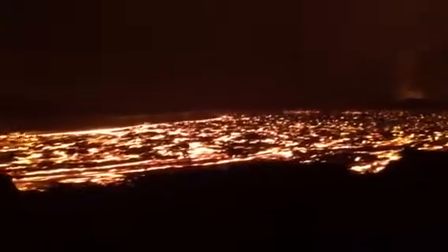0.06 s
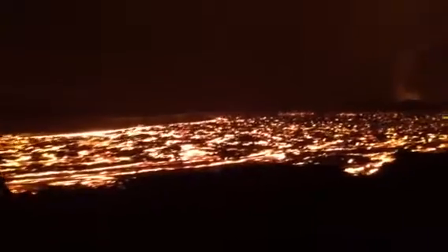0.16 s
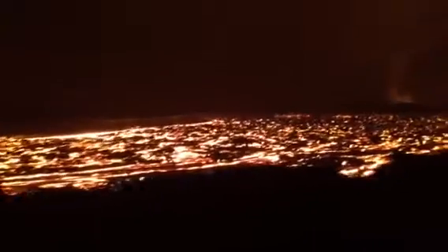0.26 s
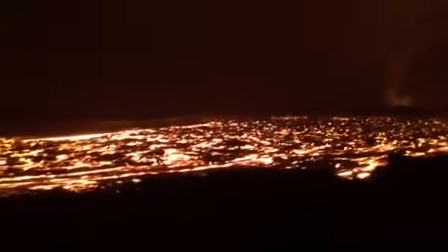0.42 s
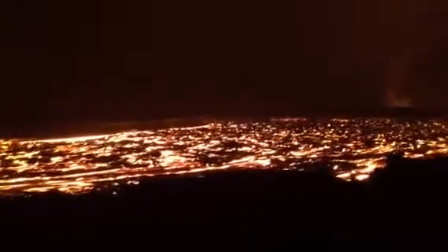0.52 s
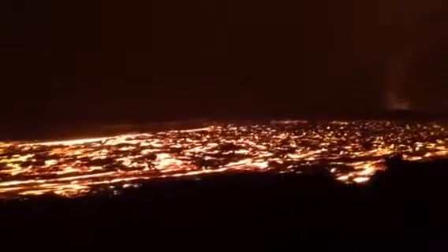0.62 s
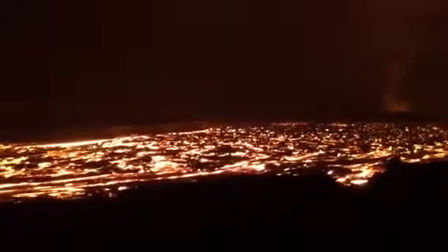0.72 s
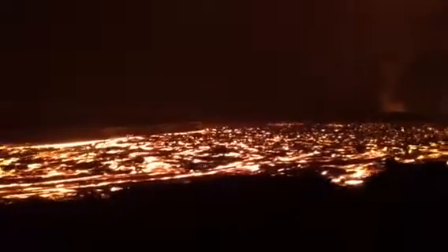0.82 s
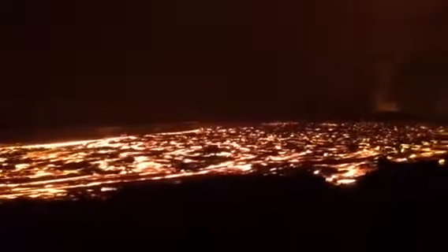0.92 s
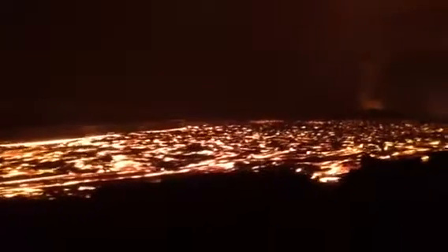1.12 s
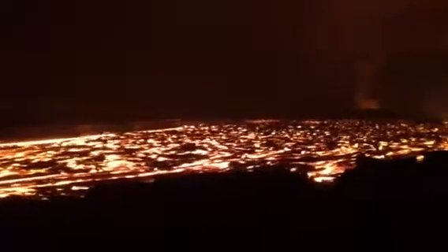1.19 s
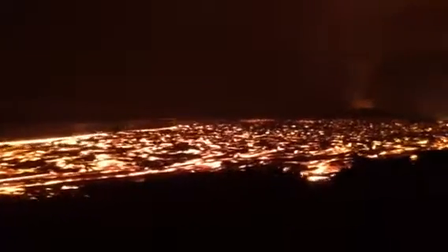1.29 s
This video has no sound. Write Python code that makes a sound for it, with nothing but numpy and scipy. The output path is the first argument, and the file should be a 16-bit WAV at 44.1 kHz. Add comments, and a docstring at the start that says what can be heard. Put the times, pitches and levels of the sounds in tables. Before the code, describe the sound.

A gust of wind rumbles and buffets an open microphone over steady fine hiss at night

```python
"""Night at the edge of a lava field, an open microphone in the wind, the flow far off.
From the start a fine, nearly even hiss lies over the low rush of the distant flow; puffs thump throughout.
Before a quarter second one strong gust rumbles in: the harder it blows, the higher the rumble reaches.
It stirs up a thin, whistling hiss, flutters in a higher roar at 0.42 s and is gone soon after 0.6 s.
One dry tick follows at 0.81 s; towards the end the rush swells a little."""
import sys
import numpy as np
from scipy import signal
from scipy.fft import rfft, irfft, next_fast_len
from scipy.io import wavfile
from scipy.ndimage import uniform_filter1d, map_coordinates

SR = 44100
rng = np.random.default_rng(int(sys.argv[2]) if len(sys.argv) > 2 else 0)


def wav_record(signal):
    """Record a signal, one row per channel, as 16-bit PCM in the file named by sys.argv[1]."""
    frames = np.transpose(np.atleast_2d(signal))
    bounded = np.clip(frames, -1, 1)
    # unit amplitude maps onto the largest positive 16-bit level
    quanta = np.round(bounded * 32767).astype(np.int16)
    wavfile.write(sys.argv[1], SR, quanta)


N = 59535  # 1.35 s


def amp(db):
    """Decibels to amplitude gain."""
    return 10 ** (np.asarray(db) / 20)


def unit(x):
    """The signal scaled to rms 1."""
    return x / np.sqrt(np.mean(x ** 2) + 1e-20)


def along(points, hz):
    """(f/Hz, value) points interpolated on a logarithmic frequency axis."""
    f, value = np.transpose(points)
    return np.interp(np.log(hz + 1), np.log(f + 1), value)


def curve(rows):
    """(t/s, value) points interpolated to one value per sample."""
    return np.interp(np.arange(N) / SR, *np.transpose(rows))


def wobble(rate):
    """A smooth random curve through `rate` normally distributed knots per second."""
    knots = rng.standard_normal(256)
    position = np.arange(N) * rate / SR + 2
    return map_coordinates(knots, [position], mode="mirror")


def filtered(x, response):
    """The signal shaped by a gain that depends on frequency in Hz."""
    size = next_fast_len(N + 8192)  # zero padding leaves room for the filter's ringing
    spectrum = rfft(x, size) * response(np.fft.rfftfreq(size, 1 / SR))
    return irfft(spectrum, size)[..., :N]


def noise(colour):
    """Random noise with the given spectrum, scaled to rms 1."""
    return unit(filtered(rng.standard_normal(N), lambda hz: amp(along(colour, hz))))


def patchy(x, depth_db):
    """The signal with random gain patches in time and frequency, scaled to rms 1."""
    z = signal.stft(x, nperseg=2048)[2]
    field = uniform_filter1d(rng.standard_normal(z.shape), size=4, axis=0)  # across frequency
    field = uniform_filter1d(field, size=7, axis=1)  # across time
    return unit(signal.istft(z * amp(depth_db * unit(field)))[1][:N])


def even(x, span_s):
    """The signal divided by its local rms under a bell of the given width: slow swells vanish."""
    t = np.arange(-SR // 10, SR // 10 + 1) / SR
    bell = np.exp(-.5 * (t / span_s) ** 2)
    power = np.abs(signal.fftconvolve(x ** 2, bell / bell.sum(), "same"))
    return x / np.sqrt(power + 1e-12)


# Pressure of the strong gust on the microphone: [t/s, level/dB]
GUST_PRESSURE = [(.18, -70), (.222, -46), (.236, -43), (.25, -43), (.263, -41), (.282, -43), (.305, -42.5),
                 (.325, -38), (.343, -40.5), (.365, -32.5), (.40, -37.5), (.411, -40), (.422, -34),
                 (.449, -49), (.464, -33.5), (.478, -42.5), (.492, -41), (.51, -54.5), (.57, -66),
                 (.64, -77)]
# Spectrum of the buffeting before the eddy size limits it: [f/Hz, relative level/dB per Hz]
BUFFET_COLOUR = [(15, -43), (28, -8), (42, -8.5), (70, 6), (120, 1.5), (200, 0.5), (300, -9.5), (420, -10),
                 (490, -29), (900, -55)]
# The rumble's upper edge is EDGE_HZ at a wind level of GUST_DB; it rises with the wind
GUST_DB, EDGE_HZ, EDGE_OCTAVES_PER_DB = -38, 370, 0.42
EDGE_DB_PER_OCTAVE = 20  # fall above the edge


def buffeting(count=13):
    """Turbulent pressure in half-octave eddy sizes; stronger wind wakes smaller, higher eddies."""
    wind_db = curve(GUST_PRESSURE)
    centres = 20 * 2 ** (np.arange(count) / 2)[:, None]

    def bands(hz):
        """Overlapping triangular bands, one for each eddy size."""
        octaves_away = np.abs(np.log2((hz + 1) / centres))
        return np.clip(1 - 2 * octaves_away, 0, 1)

    eddies = filtered(noise(BUFFET_COLOUR), bands)
    edge_shift = EDGE_OCTAVES_PER_DB * (wind_db - GUST_DB)
    octaves_over = np.clip(np.log2(centres / EDGE_HZ) - edge_shift, 0, 4)
    rumble = np.sum(eddies * amp(-EDGE_DB_PER_OCTAVE * octaves_over), axis=0)
    return amp(wind_db) * even(rumble, span_s=0.0063)


# Single puffs and thumps of wind at the microphone: [t/s, level/dB, half-length/s, centre f/Hz]
WIND_PUFFS = [(0.0, -53.5, 0.011, 60.4), (0.11, -62, 0.029, 72.5), (0.167, -50, 0.0065, 70),
              (.238, -40.5, 0.0069, 68), (.262, -39.5, .0055, 197), (0.302, -36, .011, 64.4),
              (.365, -34, .0045, 116), (.386, -30, 0.0021, 133), (.402, -29.5, 0.003, 78),
              (.424, -37.5, 0.011, 129), (0.463, -35, 0.0027, 298), (0.474, -35, 0.0067, 68),
              (0.527, -40.5, 0.012, 84.5), (0.558, -47, 0.011, 53.5), (0.611, -61, 0.012, 74),
              (0.673, -63, 0.0059, 179), (.714, -52, 0.0063, 157), (0.726, -42, 0.005, 70),
              (0.769, -50.5, 0.0039, 80), (0.79, -53, 0.017, 46.4), (0.835, -55.5, 0.0083, 184),
              (.897, -56.5, .01, 159), (0.944, -53.5, 0.002, 298), (0.969, -54.5, 0.017, 166),
              (1.02, -55.5, 0.0058, 193), (1.047, -48.5, 0.017, 61.3), (1.087, -42, 0.014, 80),
              (1.2, -53, 0.0081, 99), (1.226, -55, 0.0038, 221), (1.262, -52, 0.016, 63)]
# A puff's pitch sinks (octaves per half-length) and wanders (octaves, knots per s)
PUFF_SINK, PUFF_WANDER, PUFF_WANDER_RATE = 0.05, 0.29, 170
PUFF_ROUGH, PUFF_ROUGH_RATE = .3, 220  # raggedness of the swings: share, knots per s
PUFF_TOP_HZ = 444  # eddies much smaller than the microphone cancel out above this


def puffs():
    """Each puff is one eddy: a few uneven swings of pressure that swell, sink in pitch and fade."""
    t, out = np.arange(N) / SR, np.zeros(N)
    for at_s, db, half_length, centre in WIND_PUFFS:
        age = np.clip((t - at_s) / half_length, -6, 6)
        swell = np.exp(-.5 * age ** 2)
        wander = PUFF_WANDER * wobble(PUFF_WANDER_RATE)
        wander = wander - np.average(wander, weights=swell)  # keeps the pitch around its centre
        turns = np.cumsum(centre * 2 ** (wander - PUFF_SINK * age)) / SR
        turns_from_peak = turns - np.interp(at_s, t, turns)
        swing = np.sin(2 * np.pi * (turns_from_peak + rng.random()))
        ragged = swing * (1 + PUFF_ROUGH * wobble(PUFF_ROUGH_RATE))
        rms = np.sqrt(np.average(ragged ** 2, weights=swell ** 2))
        out += amp(db) * swell * ragged / rms
    return filtered(out, lambda hz: 1 / np.sqrt(1 + (hz / PUFF_TOP_HZ) ** 16))


# Peak of the brief flutter within the gust: [t/s, level/dB]
FLUTTER_PEAK = (0.418, -58)
FLUTTER_WIDTH_S = 0.024  # half-length of its bell-shaped swell
# Spectrum of the flutter: [f/Hz, relative level/dB per Hz]
FLUTTER_SPECTRUM = [(300, -26), (520, -4), (620, -0.5), (690, 9.5), (770, -6), (850, -9), (1000, -19),
                    (2500, -13.5), (5000, -61)]


def flutter():
    """The gust briefly breaks into a narrow, higher roar: coloured noise under a bell-shaped swell."""
    at_s, db = FLUTTER_PEAK
    swell = np.exp(-.5 * ((np.arange(N) / SR - at_s) / FLUTTER_WIDTH_S) ** 2)
    return amp(db) * swell * even(noise(FLUTTER_SPECTRUM), span_s=0.0056)


# Hiss stirred up by the gust: [t/s, level/dB]
STIR_LEVEL = [(.15, -115), (.28, -76), (.44, -71), (.54, -73.5), (.62, -96)]
# Spectrum of the stirred-up hiss, with narrow peaks: [f/Hz, relative level/dB per Hz]
STIR_SPECTRUM = [(1500, -37), (2400, -29), (2850, -5), (3300, -33), (6100, -2), (6700, 2.5), (7300, -5),
                 (10800, -8.5), (11700, 2), (12400, -17), (13800, -7), (15500, -12)]


def stir():
    """The gust brings a thin, slightly whistling hiss: noise with narrow spectral peaks."""
    return amp(curve(STIR_LEVEL)) * noise(STIR_SPECTRUM)


# Spectrum of the tiny, dry tick: [f/Hz, relative level/dB]
TICK_SPECTRUM = [(500, -10), (2500, -8), (3800, 0), (5400, 0), (7500, -12), (10000, -9), (12000, 1),
                 (13500, 0), (15500, -6)]
TICK_AT_S, TICK_PEAK_DB = .8125, -45
# Faint after-ring: level against the impulse before colouring, and time to fall 60 dB
TICK_TAIL_DB, TICK_TAIL_T60_S = -29, .07


def tick():
    """A sharp impulse with a faint, decaying noise tail, both coloured alike."""
    t = (np.arange(N) - round(TICK_AT_S * SR)) / SR
    decay = amp(TICK_TAIL_DB - 60 * np.abs(t) / TICK_TAIL_T60_S)
    tail = (t > 0) * decay * rng.standard_normal(N)
    click = filtered((t == 0) + tail, lambda hz: amp(along(TICK_SPECTRUM, hz)))
    return amp(TICK_PEAK_DB) * click / np.abs(click).max()


# Course of the hiss before HISS_DB lifts it: [t/s, level/dB]
HISS_COURSE = [(0.0, -63), (0.022, -66), (0.382, -66.5), (0.394, -65.5), (0.57, -66), (1.304, -64.5),
               (1.35, -65.5)]
HISS_DB = 1.85
# Spectrum of the hiss: [f/Hz, relative level/dB per Hz]
HISS_SPECTRUM = [(100, -3.5), (500, 4.5), (1000, 5), (1600, 4), (2200, 0.5), (2850, 3.5), (3600, .5),
                 (4600, -1), (4950, -3.5), (5350, -.5), (6700, -0.5), (7700, -3), (8700, -1), (9600, -2),
                 (10500, -6.5), (11000, -4.5), (12000, -3.5), (13500, -7), (15600, -11)]


def hiss():
    """A fine, nearly even hiss: coloured noise with small random patches and a slight level wobble."""
    level_db = curve(HISS_COURSE) + HISS_DB + 0.21 * wobble(23.5)
    return amp(level_db) * patchy(noise(HISS_SPECTRUM), depth_db=2.5)


# Distant rush before its churning is added: [t/s, level/dB]
RUSH_COURSE = [(0, -67), (.2, -65), (.6, -69), (.8, -63.5), (.96, -63), (1.12, -62.5), (1.22, -59),
               (1.35, -64.5)]
# Spectrum of the distant rush: [f/Hz, relative level/dB per Hz]
RUSH_SPECTRUM = [(20, -10), (55, -6), (120, -4), (175, -2.5), (300, -10.5), (410, -8), (500, -17.5),
                 (720, -14.5), (1200, -22.5), (2500, -30), (6000, -78)]


def rush():
    """The far flow and the moving air: low coloured noise whose level churns at random."""
    churn_db = 1.0 * wobble(21)
    return amp(curve(RUSH_COURSE) + churn_db) * even(noise(RUSH_SPECTRUM), span_s=0.019)


def scene():
    """All layers summed at one microphone, as a single channel."""
    wind = buffeting() + puffs() + flutter() + stir()
    return (wind + tick() + hiss() + rush())[None]


LOW_CUT_HZ, TOP_HZ = 21, 15720  # the microphone's bass limit and upper band limit


def record(dry):
    """The microphone loses the deepest bass and keeps nothing above its band limit."""
    return filtered(dry, lambda hz: (hz < TOP_HZ) / np.sqrt(1 + (LOW_CUT_HZ / (hz + 1)) ** 8))


dry = scene()
out = record(dry)
wav_record(out)
```